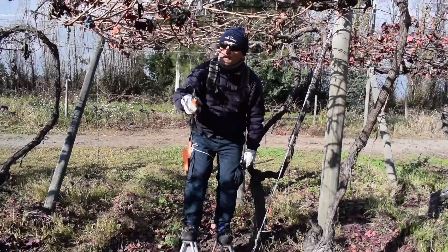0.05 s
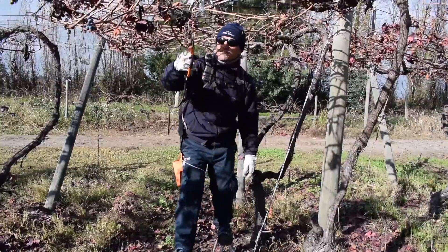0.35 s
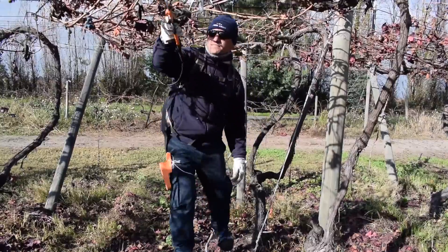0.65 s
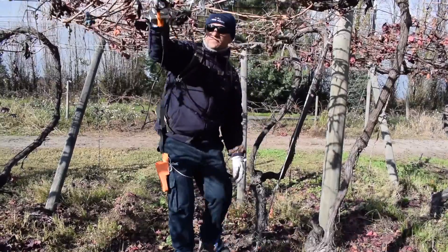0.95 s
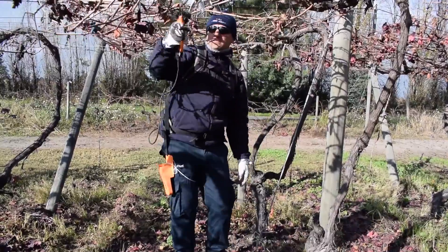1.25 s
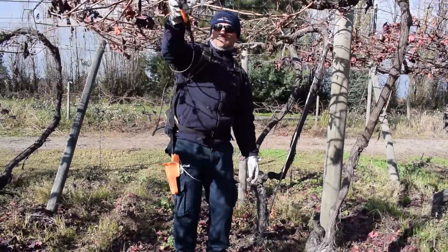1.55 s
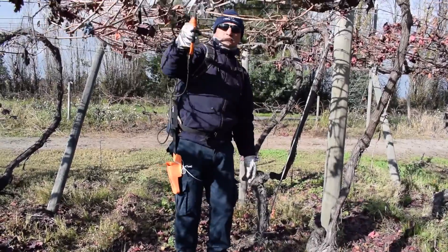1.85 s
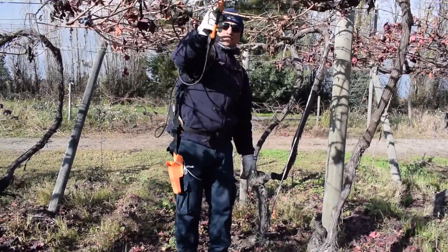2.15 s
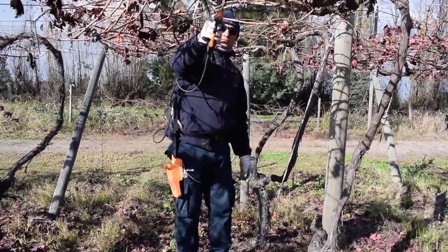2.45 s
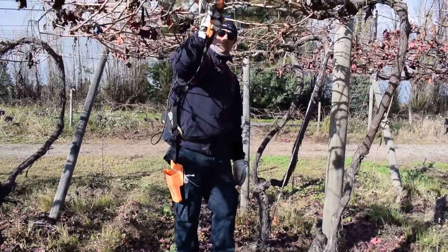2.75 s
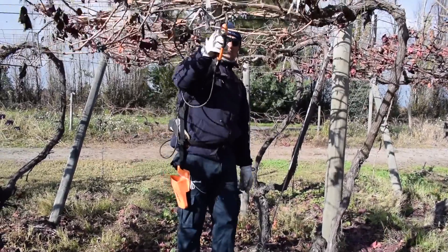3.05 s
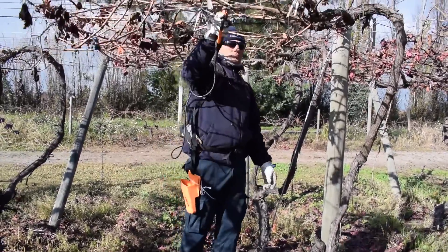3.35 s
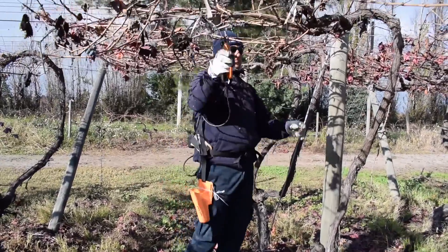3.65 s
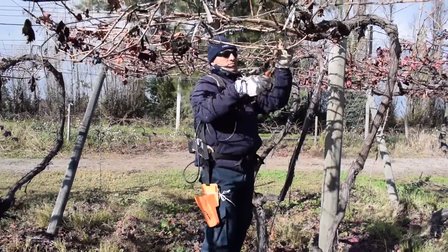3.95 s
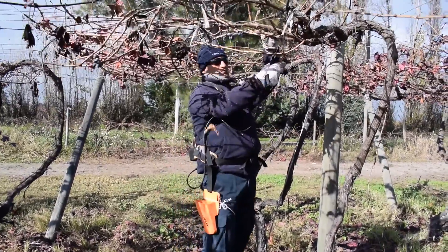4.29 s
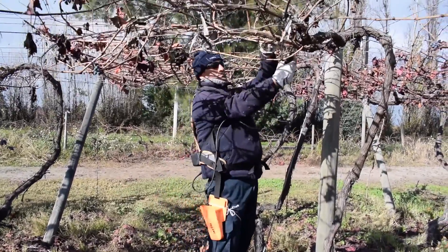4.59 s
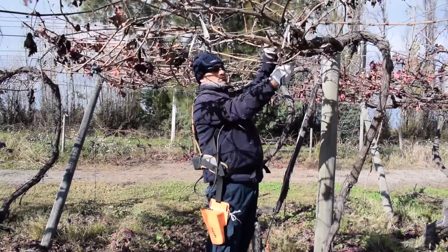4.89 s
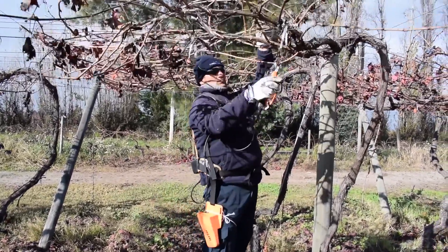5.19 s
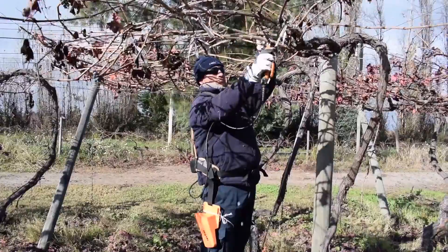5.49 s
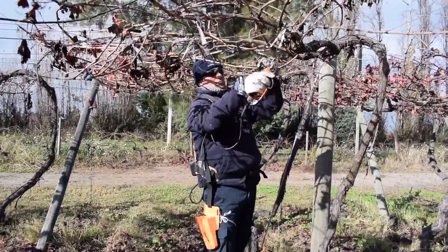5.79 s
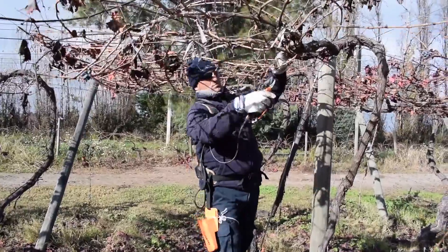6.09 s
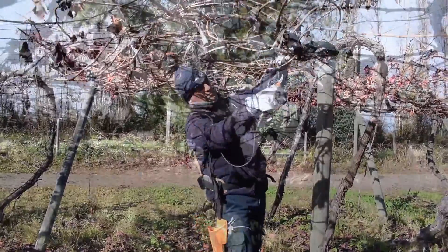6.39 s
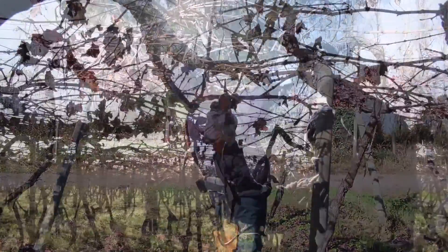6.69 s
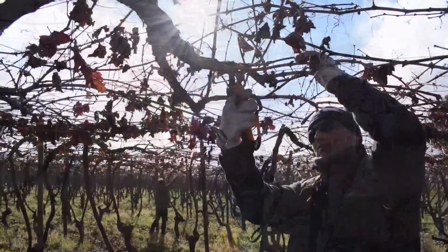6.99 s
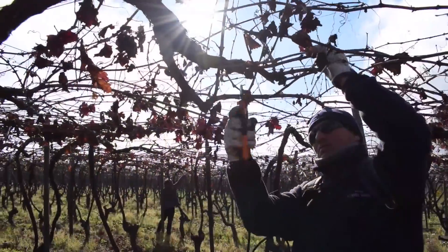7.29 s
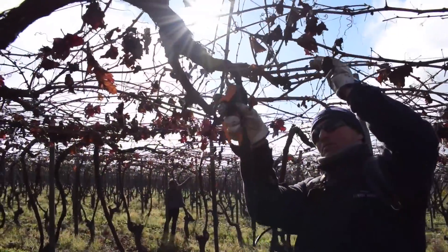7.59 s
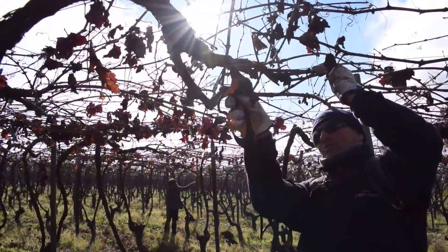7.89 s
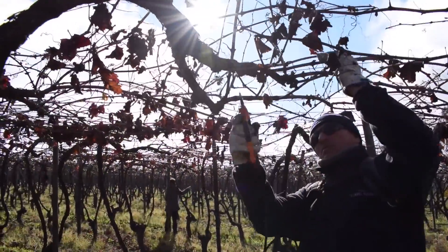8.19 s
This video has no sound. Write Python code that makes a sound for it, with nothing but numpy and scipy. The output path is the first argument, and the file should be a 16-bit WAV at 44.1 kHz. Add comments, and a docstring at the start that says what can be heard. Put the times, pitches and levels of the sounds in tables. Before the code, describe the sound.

Battery pruning shears cut vines outdoors, at first a few metres from the microphone. From 0.4 to 3.8 seconds the geared motor runs in quick bursts, each a tenth to a quarter of a second: high, sagging whines for cuts, loose rattles for reopening, each ending in a click. Wood cracks sharply at about 1.0 and 2.8 seconds. A cane knocks the trellis with a brief ring at 1.1; duller knocks follow near 1.8, 3.8, 4.2 and 6.1. Strokes then thin out, with strong cracks just before 5 seconds and another cut at 5.6. From 6.6 the shears are close and brighter, cutting at 7.1, then snapping three times around 8.0 before a last rattle. A fine, gritty rustle swells and dips throughout. Light wind rumbles over a faint outdoor background, gusting softly near 3.8 and 4.3 seconds.

```python
"""In a vineyard, one microphone on battery pruning shears, first a few metres off, then close by.
Closing, the geared motor whines and sags under load and the wood cracks; opening, the gears rattle
through the housing. A fine, gritty hiss swells and dips around the motor's runs. Cut canes knock on
the trellis and a brushed wire hums. Wind rumbles on the microphone over a faint outdoor background."""
import sys
import numpy as np
from scipy import signal
from scipy.fft import rfft, irfft
from scipy.io import wavfile

SR = 44100
rng = np.random.default_rng(int(sys.argv[2]) if len(sys.argv) > 2 else 0)


def bounce(signal):
    """Save signal as a 16-bit WAV file at the path given by the first command-line argument."""
    frames = np.transpose(np.atleast_2d(signal))
    limited = np.clip(frames, -1, 1)
    pcm = np.round(limited * 32767).astype(np.int16)
    wavfile.write(sys.argv[1], SR, pcm)


N = 367794
CLOSE_FROM_S = 6.6  # from here on the shears are close to the microphone

# cutting strokes: (start [s], stop [s], unloaded mesh tone [Hz], gears [dB], whine [dB],
# whine peak [share of stroke], handle ring [dB], case ring [dB], swish at the end of the cut [dB])
CUTS = [(0.895, 1.066, 3506, -29, -26.5, 0.87, -31.5, -41, -33),
        (1.597, 1.762, 3594, -31.5, -25.5, 0.87, -32.5, -44.5, -45),
        (2.225, 2.34, 3520, -31.5, -28, 0.71, -33.5, -39.5, -40),
        (2.741, 2.853, 3330, -28.5, -24.5, 0.33, -43, -44.5, -39),
        (3.396, 3.523, 3420, -33, -27, 0.5, -38.5, -42.5, -38),
        (4.736, 4.969, 3440, -38.5, -34, 0.13, -55, -54, -38),
        (5.557, 5.679, 3390, -30, -31, .55, -45, -44, -37), (7.093, 7.2, 3465, -27, -26, .6, -43, -33, -52),
        (7.775, 8.023, 3520, -26, -24, 0.8, -53, -43.5, -39)]
# unloaded strokes: (start [s], stop [s], gears [dB], swell over the run [dB], handle ring [dB])
FREE_STROKES = [(.39, 0.656, -42.5, -7, -49), (.705, 0.798, -41.5, 5, -43.5),
                (1.139, 1.27, -32.5, -6, -37.5), (1.33, 1.533, -49, 0, -42.5),
                (1.911, 2.069, -36, -8.5, -37), (2.438, 2.604, -35, -4, -36.5),
                (2.677, 2.74, -38.5, 4, -38), (2.993, 3.145, -38, 0, -37), (3.195, 3.36, -44.5, -7, -44),
                (3.636, 3.778, -35, -7, -37), (4.431, 4.497, -39.5, 1, -58), (5.201, 5.423, -41, -1, -48),
                (6.378, 6.525, -43, 3, -62), (6.746, 6.914, -32.5, -0.5, -40.5),
                (6.967, 7.089, -38, 11, -49), (7.344, 7.588, -29, -1.5, -46), (8.252, 8.4, -29, 0, -41)]


def cutting():
    """The motor sags as the blade bites and picks up again once the cane gives way."""
    # spectrum of gears under load: (frequency [Hz], relative level [dB])
    loaded_gears = [(200, -17), (800, -8), (1200, -2), (1900, 1), (2500, -1.5), (3300, 8.5), (4000, 0.5),
                    (5500, 2.5), (6800, 1), (7700, 2.5), (10000, 1.5), (11500, -4), (13200, -3.5),
                    (16000, -18)]
    sag_hz_per_s, yields_at = 1340, .78  # the cane gives way at this share of the stroke
    whine_rise_db, whine_drop_db, bite_swell_db = 6, 15, 2.5
    out = np.zeros(N)
    for start, stop, free_hz, gear_db, whine_db, peak_at, handle_db, case_db, _ in CUTS:
        along, gate = stroke(stop - start)
        sag_hz = sag_hz_per_s * (stop - start) * yields_at
        hz = free_hz - sag_hz * np.interp(along, [0, yields_at, 1], [0, 1, .5])
        turns = shaft_turns(hz)
        # the teeth only sing while they are pressed together
        before, after = np.interp(along, [0, peak_at], [1, 0]), np.interp(along, [peak_at, 1], [0, 1])
        pressed = undb(whine_db - whine_rise_db * before - whine_drop_db * after ** 2.1)
        pressed *= 1 - np.exp(-along / .07)
        gears = gearbox(rattle(turns, spread=3.3, slap=0.92), loaded_gears, start)
        gears *= undb(gear_db + bite_swell_db * (along - .5))
        add(out, start, gate * (whine(hz, turns) * pressed + gears + housing(turns, handle_db, case_db)))
    return out


def free_travel():
    """The blade opens again or moves without meeting wood."""
    out = np.zeros(N)
    for start, stop, gear_db, swell_db, handle_db in FREE_STROKES:
        add(out, start, free_run(start, stop - start, gear_db, swell_db, handle_db, free_case_db(start)))
    return out


def starts_and_stops():
    """Each run begins with a quiet creep taking up slack and ends with the blade clicking on its stop."""
    creep_s = .04
    creep_db, ring_db, click_db = -13.5, -8, 13.5  # relative to the run
    runs = [(start, stop, gear_db, handle_db) for start, stop, _, gear_db, _, _, handle_db, _, _ in CUTS]
    runs += [(start, stop, gear_db, handle_db) for start, stop, gear_db, _, handle_db in FREE_STROKES]
    out = np.zeros(N)
    for start, stop, gear_db, handle_db in runs:
        case_db = free_case_db(start) + ring_db
        creep = free_run(start, creep_s, gear_db + creep_db, 0, handle_db + ring_db, case_db)
        add(out, start - creep_s, creep)
        add(out, stop, snap(gear_db + click_db, fade_s=0.0011))
    return out


def free_run(start, length, gear_db, swell_db, handle_db, case_db):
    """With no load the teeth chatter loosely and the mesh tone is weak and smeared."""
    # spectrum of unloaded gears: (frequency [Hz], relative level [dB])
    free_gears = [(200, -21), (850, -15.5), (1300, 1), (1750, -2.5), (2400, 1.5), (2850, 0.5), (3400, 4.5),
                  (3900, -1.5), (5000, -1), (7800, -5.5), (11200, -9.5), (12400, -11), (16000, -23)]
    along, gate = stroke(length, spin_up_s=0.0011, brake_s=0.0033)
    hz = 3420 * (1 + .035 * walk(len(gate), 60))
    turns = shaft_turns(hz)
    teeth = rattle(turns, spread=1.8, slap=.6)
    gears = gearbox(teeth, free_gears, start) + undb(-12.5) * whine(hz, turns, jitter=0.0325)
    return gate * (gears * undb(gear_db + swell_db * (along - .5)) + housing(turns, handle_db, case_db))


def free_case_db(start):
    """Level of the gear case ring without load, close by or a few metres off."""
    return -42 if start > CLOSE_FROM_S else -46.5


def stroke(length, spin_up_s=0.001, brake_s=0.0049):
    """Progress 0-1 and envelope of one motor run."""
    t = np.arange(int((length + 0.046) * SR)) / SR
    gate = (1 - np.exp(-t / spin_up_s)) * np.exp(-np.maximum(t - length, 0) / brake_s)
    return np.minimum(t / length, 1), gate


def shaft_turns(mesh_hz, teeth=60):
    """Running count of shaft turns; each tooth makes one cycle of the mesh tone."""
    return np.cumsum(mesh_hz) / SR / teeth


def whine(hz, turns, sway=0.014, jitter=0.0058, flutter_db=3):
    """Gear mesh tone; shaft run-out sways its pitch and strength once a turn, single teeth roughen it."""
    # harmonics of the mesh tone: (multiple, level [dB])
    harmonics = [(1, 0), (2, -8), (3, -12.5), (4, -16.5)]
    n, wobble = len(hz), np.sin(2 * np.pi * turns)
    phase = 2 * np.pi * np.cumsum(hz * (1 + sway * wobble + jitter * walk(n, 451))) / SR
    partials = sum(undb(db + flutter_db * walk(n, 400)) * np.sin(k * phase + 0.5 * walk(n, 500))
                   for k, db in harmonics)
    return unit(partials * undb(1.3 * wobble + 1.6 * walk(n, 90.5)))


def rattle(turns, spread, slap, slap_turns=0.18):
    """Gritty tooth contact; the backlash slaps about twice a turn, never equally hard or on time."""
    n = len(turns)
    since_slap = (turns + .09 * walk(n, 70)) % .5
    slaps = np.exp(-since_slap / slap_turns) * undb(3.4 * walk(n, 125))
    return unit(grit(n, spread) * (1 + slap * slaps))


def gearbox(drive, spectrum, start):
    """Rattle radiated by the tool; close to the microphone, its middle treble stands out."""
    # added colour at close range: (frequency [Hz], relative level [dB])
    close_by = [(200, 1), (1200, -2), (1950, 4.5), (2500, 0.5), (3500, 6.5), (4000, 9), (4500, 6),
                (5000, 7.5), (5600, 2.5), (6900, 6), (7600, 2.5), (10000, -2), (12900, 1.5), (16000, -4)]
    sound = colour(drive, spectrum)
    return unit(colour(sound, close_by) if start > CLOSE_FROM_S else sound)


def housing(turns, handle_db, case_db):
    """Tooth impacts ring the hollow handle and the lower gear case, unevenly as the grip shifts."""
    n = len(turns)
    handle = resonate(rattle(turns, spread=1.4, slap=1.8), hz=4566, width_hz=650)
    handle *= undb(1.7 * walk(n, 33.7))
    case = resonate(rattle(turns, spread=1.55, slap=2.8), hz=1219, width_hz=263)
    case *= undb(3.4 * walk(n, 48.8))
    return undb(handle_db) * unit(handle) + undb(case_db) * unit(case)


def cracking():
    """Wood cracks and the blade snaps sharply."""
    # cracks and snaps: (time [s], level [dB], fade [s])
    cracks = [(.397, -20.5, 0.0026), (.573, -17, 0.00046), (0.99, -6.5, 0.00066), (1.025, -8.5, 0.0017),
              (1.053, -14, 0.00083), (1.599, -22.5, 0.0026), (2.066, -25, 0.0034), (2.323, -15, 0.0031),
              (2.363, -18, 0.0043), (2.837, -5, 0.00083), (3.49, -13.5, 0.006), (3.908, -22, 0.002),
              (4.875, -4, 0.00083), (4.945, -13, 0.0029), (4.966, -1.5, 0.00043), (5.667, -13.5, 0.0043),
              (7.134, -10, .0009), (7.157, -6, 0.00054), (7.332, -22.5, 0.0029), (7.589, -11, 0.00067),
              (7.947, -6, 0.0021), (7.974, -4, 0.001), (7.997, -2.5, .0013), (8.12, -23.5, 0.0063)]
    out = np.zeros(N)
    for start, db, fade_s in cracks:
        add(out, start, snap(db, fade_s))
    return out


def snap(db, fade_s):
    """A bright crack with a low thud; slow breaks of thick wood thud more."""
    # spectra of the crack and of the thud: (frequency [Hz], relative level [dB])
    crack_spectrum = [(200, -29), (900, -35), (3000, 4.5), (5500, 5), (10500, 1.5), (16000, -10)]
    thud_spectrum = [(80, -26), (190, -3.5), (330, -9), (550, -2.5), (780, -1.5), (1100, 3), (1900, 1),
                     (3000, -1.5), (8000, -18.5)]
    t = np.arange(SR // 4) / SR
    crack = colour(burst(t, fade_s, tail_db=-20, tail_s=.01) + 2 * (t == 0), crack_spectrum)
    thud = colour(burst(t, 1.94 * fade_s, tail_db=-9.5, tail_s=0.015), thud_spectrum)
    thud_db = -4.5 + 3 * np.log2(fade_s / 0.0015)  # 3 dB more per doubling of the fade
    return undb(db - 8.5) * (crack + undb(thud_db) * thud)


def burst(t, fade_s, tail_db, tail_s):
    """Fibres giving way: a fast burst of impacts and a weak scatter from the vines around."""
    return rng.choice([-1, 1], len(t)) * (np.exp(-t / fade_s) + undb(tail_db) * np.exp(-t / tail_s))


def knocking():
    """Canes knock together dully and may set the trellis ringing."""
    # knocks: (time [s], level [dB], fade [s], pitch [ratio to a usual cane], ring [dB re knock])
    knocks = [(0.05, -28.5, 0.0035, 0.92, -40), (0.117, -33.5, 0.011, 0.78, -14),
              (1.113, -5.5, 0.0057, 1.03, -13.5), (1.826, -10.5, 0.0034, 0.9, -42),
              (3.7755, -12.5, 0.0011, 1.1, -40), (3.806, -15, 0.0025, 0.91, -28),
              (4.159, -14.5, 0.0043, 0.8, -23), (5.997, -17.5, 0.0018, 1.15, -37),
              (6.106, -18.5, .0027, 0.7, -32), (6.56, -18, .0016, 1.13, -41), (7.739, -29, .002, .9, -35),
              (7.766, -17, 0.0024, 1, -23)]
    # spectrum of a cane of usual thickness: (frequency [Hz], relative level [dB])
    cane_spectrum = [(150, -26), (600, -16), (1200, 2), (1650, -2), (1950, -1), (2300, 3), (2650, -4.5),
                     (3000, 4), (3700, 3), (4700, -15), (7000, -16), (10000, -12.5), (15000, -39)]
    # modes of a struck trellis wire and its fitting: (frequency [Hz], level [dB], t60 [s])
    trellis_modes = [(622, -3.5, 0.15), (782, -7, 0.27), (1423, -10, 0.19), (2324, 10, 0.076),
                     (2640, -3, 0.083), (3219, -3, .08), (3630, 8.5, 0.064), (5240, 2.5, 0.095),
                     (6300, -2, 0.065), (8500, -1, 0.047)]
    out, t = np.zeros(N), np.arange(SR // 4) / SR
    ring = sum(undb(db - 60 * t / t60) * np.sin(2 * np.pi * hz * t) for hz, db, t60 in trellis_modes)
    for start, db, fade_s, pitch, ring_db in knocks:
        impact = burst(t, fade_s, tail_db=-22, tail_s=0.0083) + 0.46 * (t == 0)
        knock = colour(impact, np.array(cane_spectrum) * [pitch, 1])
        add(out, start, undb(db - 7) * (knock + undb(ring_db) * ring))
    return out


def wire():
    """A trellis wire brushed in passing hums briefly."""
    # the wire's one mode: (time [s], frequency [Hz], level [dB], t60 [s])
    wire_mode = (.115, 835, -49, .9)
    start, hz, db, t60 = wire_mode
    out, t = np.zeros(N), np.arange(SR // 2) / SR
    add(out, start, undb(db - 60 * t / t60) * np.sin(2 * np.pi * hz * t))
    return out


def gritty_hiss():
    """A fine, gritty hiss with small ticks swells and dips around the motor's runs."""
    # course of the hiss: (time [s], level [dB])
    hiss_levels = [(0, -51.5), (.26, -56), (.29, -42), (.43, -40.5), (.68, -50.5), (1.3, -44),
                   (1.55, -42.5), (1.86, -42.5), (2.55, -45), (2.63, -45), (3.05, -36.5), (3.18, -47.5),
                   (3.88, -41), (4.1, -35), (4.2, -43.5), (4.42, -47), (4.52, -52.5), (4.7, -55.5),
                   (4.76, -42.5), (5.13, -37), (5.47, -48.5), (5.87, -35), (6.25, -44.5), (6.6, -49),
                   (6.9, -43.5), (7.28, -50), (7.57, -38), (7.62, -55), (7.72, -57), (8.3, -42)]
    # spectrum of the hiss: (frequency [Hz], relative level [dB])
    hiss_spectrum = [(180, -33.5), (300, -5.5), (379, -3.5), (546, -4.5), (787, -1.5), (900, -0.5),
                     (1640, 2), (2210, 1.5), (9240, -4.5), (13800, -12), (16000, -28)]
    ticks_per_s, swish_rise_s, swish_fall_s = 260, 0.085, 0.15
    t = np.arange(N) / SR
    ticks = rng.uniform(-1, 1, N) * (rng.random(N) < ticks_per_s / SR)
    hiss = grit(N, 3.44) * undb(walk(N, 60)) + undb(-7.5) * unit(ticks)
    power = undb(np.interp(t, *np.transpose(hiss_levels))) ** 2
    for _, stop, *_, swish_db in CUTS:
        swish = np.exp(-np.maximum((stop - t) / swish_rise_s, (t - stop) / swish_fall_s))
        power += (undb(swish_db) * swish) ** 2
    return colour(hiss, hiss_spectrum) * np.sqrt(power)


def wind():
    """A breeze and gusts buffet the microphone; close by, the canopy gives it some shelter."""
    # gusts: (middle [s], half length [s], level [dB])
    gusts = [(3.78, 0.15, -42), (4.32, .055, -42)]
    # spectrum of wind on the microphone: (frequency [Hz], relative level [dB])
    buffet_spectrum = [(20, -23), (45, -2.5), (80, 1), (140, -9), (300, -29.5), (1000, -59)]
    breeze_db, shelter_db = -54.5, -3.5
    t = np.arange(N) / SR
    strength = undb(breeze_db + shelter_db * (t > CLOSE_FROM_S))
    for middle, half, db in gusts:
        strength += undb(db) * np.exp(-((t - middle) / half) ** 2)
    return colour(rng.standard_normal(N), buffet_spectrum, size=8192) * strength


def open_air():
    """Distant rumble and hiss, wavering slightly."""
    # spectrum of the outdoor background: (frequency [Hz], relative level [dB])
    outdoors = [(15, -34), (25, -12), (102, -3.5), (190, -6.5), (263, -11), (363, -13.5), (476, -16),
                (516, -14), (575, -14), (695, -13), (775, -14), (840, -17), (1020, -15.5), (9070, -56),
                (16000, -50)]
    return colour(rng.standard_normal(N), outdoors, size=8192) * undb(-50.5 + 1.2 * walk(N, 5.3))


def undb(db):
    """Decibels to gain."""
    return 10 ** (np.asarray(db) / 20)


def unit(x):
    """Scale to rms 1."""
    return x / np.sqrt(np.mean(x ** 2) + 1e-18)


def colour(x, points, size=2048):
    """Causal filter of unit power gain through (frequency [Hz], level [dB]) points."""
    hz, db = np.transpose(points)
    grid = np.maximum(np.arange(size // 2 + 1) * SR / size, 1)
    cepstrum = irfft(np.log(undb(np.interp(np.log(grid), np.log(hz), db))))
    cepstrum[1:size // 2] *= 2  # fold to minimum phase
    cepstrum[size // 2 + 1:] = 0
    response = irfft(np.exp(rfft(cepstrum)))
    return signal.fftconvolve(x, response / np.linalg.norm(response))[:len(x)]


def resonate(x, hz, width_hz):
    """A steep resonance: one band-pass applied twice."""
    b, a = signal.iirpeak(hz, hz / width_hz, fs=SR)
    return signal.lfilter(b, a, signal.lfilter(b, a, x))


def walk(n, rate):
    """Smooth random drift of spread about 1, with rate new values a second."""
    at = np.arange(n) * rate / SR
    return 1.3 * np.interp(at, np.arange(n), rng.standard_normal(n))


def grit(n, spread):
    """Dense tiny impacts; a larger spread lets single ones stand out."""
    return unit(rng.standard_normal(n) * undb(spread * np.minimum(rng.exponential(size=n), 7)))


def add(track, start, x):
    """Mix a sound into the track at start [s]."""
    i = max(int(start * SR), 0)
    track[i:i + len(x)] += x[:max(N - i, 0)]


def scene():
    """Shears, wood, wire, hiss and open air at one microphone."""
    shears = cutting() + free_travel() + starts_and_stops()
    vines = cracking() + knocking() + wire()
    return (shears + vines + gritty_hiss() + open_air() + wind())[None]


def record(dry, top_hz=15850):
    """The microphone chain cuts off the top treble steeply."""
    return signal.sosfilt(signal.ellip(10, .2, 70, top_hz, fs=SR, output="sos"), dry)


dry = scene()
out = record(dry)
bounce(out)
```